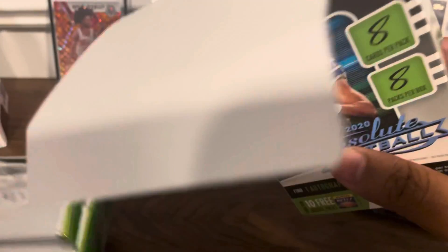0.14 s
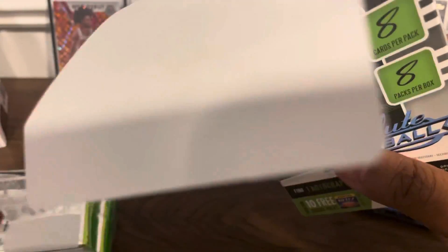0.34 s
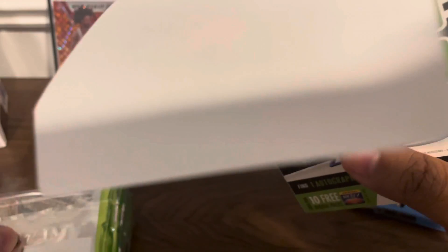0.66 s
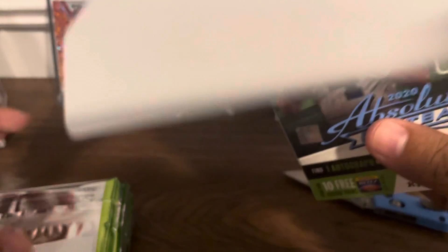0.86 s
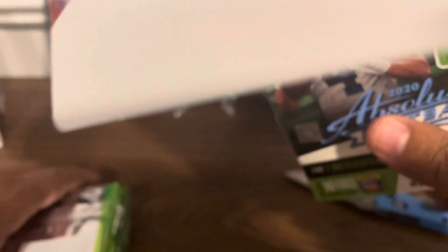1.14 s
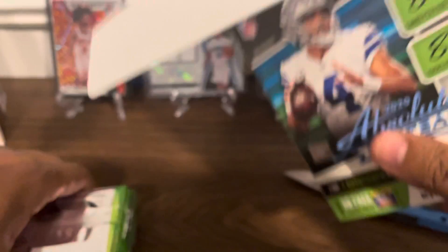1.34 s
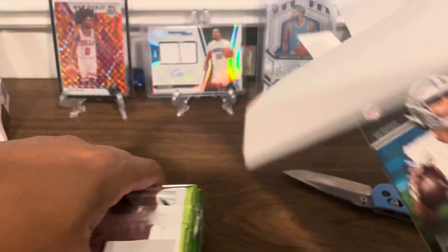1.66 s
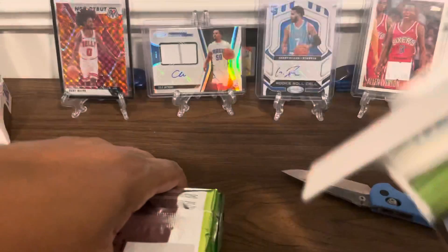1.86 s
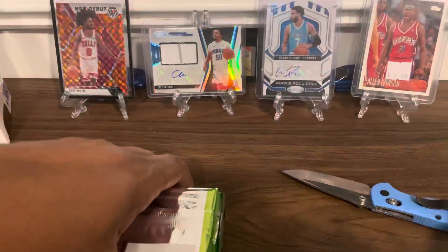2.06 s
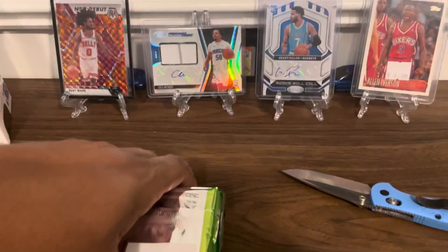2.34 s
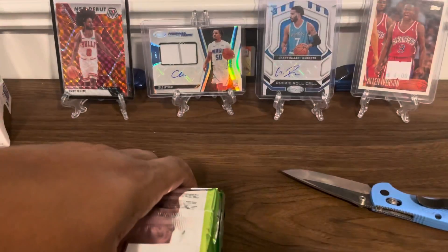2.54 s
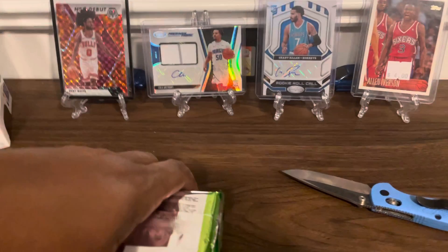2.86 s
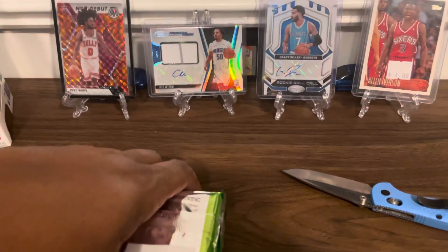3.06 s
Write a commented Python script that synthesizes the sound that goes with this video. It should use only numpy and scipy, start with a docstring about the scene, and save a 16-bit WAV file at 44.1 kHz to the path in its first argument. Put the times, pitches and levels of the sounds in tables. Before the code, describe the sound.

Cardboard box handling: foil packs snap and rustle at left, pause, crackle again, then the box clatters and rubs down at right with soft wooden thuds; close stereo phone pickup, short room echo, faint air.

```python
"""A hand grips a stack of foil packs on a wooden table: snaps of noise crackle and fine grains rustle.
An empty cardboard box is set down to the right: rough contacts ring its modes, and card scrapes as noise.
The table thuds in decaying low modes and rumbles under shifting weight; a small metal stand pings once.
A small quiet room adds a short echo and faint air; a phone with two microphone ports hears it close by."""
import sys
import numpy as np
from scipy import signal
from scipy.fft import rfft, irfft
from scipy.io import wavfile
from scipy.ndimage import uniform_filter1d

SR = 44100
rng = np.random.default_rng(int(sys.argv[2]) if len(sys.argv) > 2 else 0)


def wav_out(sig):
    """Save sig, one row per channel (or a flat mono array), as 16-bit PCM at SR to the path in sys.argv[1]."""
    wavfile.write(sys.argv[1], SR, np.round(np.clip(np.atleast_2d(sig).T, -1, 1) * 32767).astype(np.int16))


N = 141120  # length in samples
T = np.arange(N) / SR  # time in seconds
BOX_FROM_S = 1.76  # from here the rustle comes from the box
LATE = T > BOX_FROM_S
OPPOSITE = np.array([[1], [-1]])  # one sign for each port

# The low, middle and high noise bands of foil and card.
# Each row: centre in Hz, width in Hz.
NOISE_BANDS = [(1100, 1340), (4000, 3600), (11000, 5450)]
# The ways the cardboard box can ring.
# Each row: pitch in Hz, relative level in dB, time to fade by 60 dB in seconds.
BOX_MODES = [(355, -5.5, 0.064), (434, -7.5, 0.048), (593.6, -7.5, 0.053), (691, -7.5, 0.069),
             (813, -0.5, 0.07), (881, -1.5, 0.081), (1026, 5, 0.055), (1298, 4, 0.025), (1576, 7.5, 0.018),
             (1780, 12, 0.018), (1925, 10.5, 0.022), (2580, 8, 0.035)]


def amp(db):
    """Turns dB into a plain gain."""
    return 10 ** (np.asarray(db) / 20)


def band(x, hz, width):
    """Keeps a band around hz, with edges width apart."""
    low_edge = np.sqrt(hz ** 2 + width ** 2 / 4) - width / 2
    high_edge = min(low_edge + width, .45 * SR)
    return signal.sosfilt(signal.butter(2, [low_edge, high_edge], "band", fs=SR, output="sos"), x)


def unit(x):
    """Scales a signal to an average (RMS) level of 1."""
    return x / np.sqrt(np.mean(x ** 2))


def curve(rows, col):
    """Gain over time, drawn between the dB values in one column."""
    rows = np.array(rows)
    return amp(np.interp(T, rows[:, 0], rows[:, col]))


def log_curve(f, rows):
    """Values drawn between the rows along a logarithmic pitch scale."""
    hz, value = np.array(rows).T
    return np.interp(np.log(f), np.log(hz), value)


def add(out, s, x, db):
    """Mixes x in at time s with its peak at db."""
    i = int(s * SR)
    out[i:i + len(x)] += (x * amp(db) / np.abs(x).max())[:N - i]


def fade(t, t60):
    """Dies away by 60 dB in t60 seconds."""
    return np.exp(-np.log(1000) * t / t60)


def ring(modes, lags=0, size=16384):
    """One blow sounds a set of modes: fading sine waves, each starting after its lag in seconds."""
    hz, db, t60 = np.array(modes).T[:, :, None]
    t = np.clip(np.arange(size) / SR - lags, 0, None)
    return (amp(db) * np.sin(2 * np.pi * hz * t) * fade(t, t60)).sum(axis=0)


def blow(modes, pitch, db_per_oct, chance, lags=0):
    """A blow favours modes near its pitch; each finds them a little shifted, some turned over."""
    detune, scatter_db = .045, 2  # random shifts of pitch and level from blow to blow
    hz, db, t60 = np.array(modes).T
    shift, scatter, turn = chance
    db = db - db_per_oct * np.abs(np.log2(hz / pitch)) + scatter_db * scatter
    hz = hz * (1 + detune * shift) * np.sign(turn)  # a negative pitch turns the wave over
    return ring(np.array([hz, db, t60]).T, lags)


def ring_on(noise, modes):
    """Lets two rows of steady noise keep a set of modes ringing."""
    return signal.fftconvolve(noise, ring(modes)[None], axes=1)[:, :N]


def walk(rate):
    """Random level that wanders about rate times a second, with RMS 1."""
    k = int(SR / rate)
    steps = np.repeat(rng.uniform(-1, 1, N // k + 1), k)
    return unit(uniform_filter1d(steps, k)[:N])


def ports(x, phase, balance):
    """Sends a sound to both ports with a phase and level difference that depend on pitch."""
    f = np.arange(N // 2 + 1) * SR / N
    turn = np.interp(f, *np.array(phase).T)
    half = amp(log_curve(f + 1, balance) / 2) * np.exp(.5j * turn)  # each port takes half the difference
    return irfft(rfft(x) * np.array([half, 1 / half]), N)


def crackles():
    """Each foil crease snaps: a short noise crack with a weaker, longer tail, in three bands."""
    # Each row: start in seconds, peak level in dB, low band and high band in dB against the middle one.
    snaps = [(0.0296, -35, 4, -6), (0.1878, -25.5, 7, -23.5), (0.2157, -24, 4.5, -2.5),
             (0.2253, -24, 2.5, 3), (0.2486, -19, -1.5, 2), (0.2778, -26.5, -4, -0.5),
             (0.3013, -15, -10.5, 9.5), (0.364, -37.5, 12.5, 0.5), (0.4297, -15, 0, 7),
             (0.4505, -31, -3, -7.5), (0.462, -30, -3.5, -4.5), (0.473, -30, 5, -15.5),
             (0.5213, -21.5, -4, 1), (0.5421, -23.5, 6, -5.5), (0.621, -32.5, 4, 8.5),
             (0.638, -27.5, 1.5, -2), (0.6515, -13.5, 3, 1.5), (0.73, -28.5, -1, -1),
             (1.1294, -18.5, -5, 7.5), (1.148, -18, 1, 4), (1.179, -34, 7, -26), (1.3038, -26.5, 0.5, -5.5),
             (1.4182, -29.5, 7.5, -0.5), (2.0189, -38.5, 12, 7), (2.7308, -27.5, 5.5, -1.5),
             (2.8458, -19.5, -48, -8.5), (3.1535, -39, -1, 11)]
    crack_ms, tail_ms, tail_db = .9, 7, -17
    out, ms = np.zeros(N), np.arange(2048) / SR * 1000
    decay = np.exp(-ms / crack_ms) + amp(tail_db) * np.exp(-ms / tail_ms)
    envelope = np.clip(ms / 0.3, 0, 1) * decay
    noises = rng.standard_normal((len(snaps), len(ms)))
    for (s, db, body_db, sheen_db), noise in zip(snaps, noises):
        gains_db = (body_db, 0, sheen_db)
        crack = sum(amp(g) * band(noise * envelope, *b) for g, b in zip(gains_db, NOISE_BANDS))
        add(out, s, crack, db)
    return out


def rustle():
    """Dense tiny grains in three bands; late on, the lowest is card rubbing that rings the box."""
    # How loud foil and then card rustle over time.
    # Each row: time in seconds, level of the low, middle and high band in dB.
    rustle_levels = [(0, -66, -74.5, -65), (.18, -69, -63.5, -59), (.22, -57.5, -73, -87),
                     (.42, -68, -61, -54), (.44, -52.5, -59.5, -52), (.56, -56.5, -59.5, -51),
                     (.6, -65, -62.5, -62.5), (.74, -67, -59.5, -77), (.9, -88.5, -99, -104),
                     (1.105, -84.5, -117, -111), (1.13, -53.5, -50, -51), (1.17, -61.5, -67, -57),
                     (1.35, -61.5, -61.5, -51.5), (1.45, -57, -60, -50.5), (1.6, -65, -66, -50.5),
                     (1.75, -81.5, -67, -59), (1.81, -63.5, -66, -64), (1.93, -100, -97.5, -88),
                     (2.01, -89, -79, -76), (2.03, -76.5, -60, -61), (2.1, -63.5, -90, -67),
                     (2.115, -68, -56, -63), (2.26, -57, -53.5, -51.5), (2.29, -74, -70, -65),
                     (2.315, -51, -37.5, -38), (2.375, -36.5, -34.5, -38.5), (2.41, -54.5, -64, -75),
                     (2.52, -59.5, -58, -57.5), (2.69, -69, -76.5, -81), (2.72, -61.5, -46, -57),
                     (2.8, -62.5, -51, -55), (2.83, -59, -66, -88), (2.9, -58, -64, -74),
                     (3.2, -77, -66.5, -67.5)]
    grains_per_s, grain_spread_db = 6000, 2.5  # foil grains
    patchy_db, flicker_db = 1.5, 2  # unevenness between narrow bands of card; flicker of each band

    # First row: what both ports share. Second row: what they hear unlike.
    boost_db = grain_spread_db * np.minimum(rng.exponential(size=(2, N)), 4)
    size = amp(boost_db) * rng.standard_normal((2, N))
    chance = np.where(LATE, 1, grains_per_s / SR)  # card rubs evenly, with a grain at every sample
    card_size = np.sign(size) * np.sqrt(np.abs(size))  # evens out the grain sizes
    size = np.where(LATE, card_size, size * np.sqrt(.5 / chance))
    low, mid, high = (unit(band((rng.random((2, N)) < chance) * size, *b)) for b in NOISE_BANDS)

    rubbed_box = unit(ring_on(low, BOX_MODES)) + 1.86 * low
    low = np.where(LATE, rubbed_box, low)
    patches = np.zeros((2, N))
    for k in range(5):
        hz = 2300 * 1.323 ** k
        patches += band(mid, hz, hz / 3) * amp(patchy_db * walk(70) - 1.4 * k)
    mid = np.where(LATE, unit(patches), mid)
    high = high * np.array([[1], [.2]])  # the treble is more alike at the ports

    out = np.zeros((2, N))
    for k, x in enumerate((low, mid, high)):
        out += x * curve(rustle_levels, k + 1) * amp(flicker_db * walk(29.55))
    return out


def box():
    """Knocks ring the box through a soft, rough contact, with a brief slap of card."""
    # Each row: start in seconds, peak level of the ringing in dB, favoured pitch in Hz.
    knocks = [(1.804, -32.5, 778), (1.895, -43.5, 815), (2.064, -37.5, 567), (2.108, -36, 383),
              (2.199, -19.5, 654), (2.241, -25, 548), (2.277, -26.5, 735), (2.332, -17, 886),
              (2.352, -21.5, 1930), (2.366, -18.5, 800), (2.386, -12, 860), (2.47, -23, 585),
              (2.846, -23.5, 566), (2.855, -25, 830), (3.005, -44, 875)]
    favour_db_per_oct, contact_ms = 8, 1.94
    slap_db, slap_ms = -18, 6.2  # slap level is against the ringing
    out, ms = np.zeros(N), np.arange(2048) / SR * 1000
    paired_modes = 2 * BOX_MODES  # each mode sounds twice, slightly apart in pitch, for a rougher knock
    chances = rng.standard_normal((len(knocks), 3, len(paired_modes)))
    noises = rng.standard_normal((len(knocks), len(ms)))
    for (s, db, pitch), noise, chance in zip(knocks, noises, chances):
        rough_tone = np.sin(2 * np.pi * pitch * ms / 1000) + 1.58 * noise
        contact = rough_tone * ms * np.exp(-2 * ms / contact_ms)
        ringing = blow(paired_modes, pitch, favour_db_per_oct, chance)
        add(out, s, signal.fftconvolve(ringing, contact), db)
        slap = noise * np.clip(ms, 0, 1) * np.exp(-ms / slap_ms)
        add(out, s, band(slap, *NOISE_BANDS[1]), db + slap_db)
    return out


def metal_stand():
    """A small metal stand rings once: a few high modes fade together."""
    # Each row: pitch in Hz, relative level in dB, time to fade by 60 dB in seconds.
    stand_modes = [(3155, 0, .45), (4414, -6, .3), (5798, -9, .4), (7262, -13, .4)]
    out = np.zeros(N)
    add(out, 3.027, ring(stand_modes), -56)  # start in seconds, peak in dB
    return out


def table():
    """Thuds sweep downward as the low modes arrive late; shifting weight keeps them rumbling."""
    # Each row: start in seconds, peak level in dB, favoured pitch in Hz.
    thuds = [(0.213, -37, 312), (0.22, -44, 65), (0.544, -38.5, 84.5), (.647, -40, 300), (0.661, -48, 62),
             (1.183, -27.5, 240), (1.19, -26.5, 64), (1.42, -26, 224), (1.606, -40, 180),
             (2.205, -28.5, 170), (2.232, -27.5, 130), (2.253, -28, 290), (2.345, -27.5, 160),
             (2.368, -30.5, 174), (2.408, -31, 200), (2.467, -33.5, 254), (2.622, -39, 270),
             (2.8, -33.5, 95), (2.823, -31, 197), (2.886, -34, 100), (2.98, -37, 165), (3.019, -41.5, 70)]
    # The ways the table top can ring.
    # Each row: pitch in Hz, relative level in dB, time to fade by 60 dB in seconds.
    table_modes = [(63.7, -6, 0.26), (114.2, -2, 0.092), (149.7, 1, 0.068), (186.8, -4.5, 0.12),
                   (248.3, -1, 0.061), (325.3, -3.5, 0.091), (454, 7.5, 0.029), (640, -8, 0.085)]
    # Weight shifting on the table.
    # Each row: time in seconds, level of the lowest mode in dB, level of the next five modes in dB.
    rumble_levels = [(0, -72, -68), (.7, -72.5, -65), (.9, -85.5, -79), (1.15, -75, -70), (1.3, -52, -54),
                     (1.42, -64, -48), (1.52, -44, -48.5), (1.77, -74, -61.5), (2.1, -55.5, -61.5),
                     (2.35, -54, -36.5), (2.6, -62, -62), (2.88, -47, -49.5), (3.2, -68, -69)]
    favour_db_per_oct, bend_lag_ms = 10, 16.2

    out, hz = np.zeros((2, N)), np.array(table_modes)[:, :1]
    lags = bend_lag_ms / 1000 * (np.sqrt(60 / hz) - .31)  # low bending waves come late
    chances = rng.standard_normal((len(thuds), 3, len(table_modes)))
    for (s, db, pitch), chance in zip(thuds, chances):
        add(out[0], s, blow(table_modes, pitch, favour_db_per_oct, chance, lags), db)
    for k, modes in enumerate((table_modes[:1], table_modes[1:6])):
        push = rng.standard_normal((2, N)) * amp(1.85 * walk(29.94))
        out = out + unit(ring_on(push, modes)) * curve(rumble_levels, k + 1)
    return out


def room_echo(dry):
    """The room answers with a short spray of reflections: noise that fades, unlike at each port."""
    echo_db, echo_t60_s = -9.5, 0.34
    t = T[:SR // 2]
    tail = rng.standard_normal((2, len(t))) * fade(t, echo_t60_s) * np.clip(t / 0.0048, 0, 1)
    tail = band(tail, 1000, 12000)
    tail = tail / np.sqrt((tail ** 2).sum() / 2)
    return amp(echo_db) * signal.fftconvolve(dry.mean(axis=0)[None], tail, axes=1)[:, :N]


def room_tone():
    """Faint steady air is shaped noise; its bass is more alike left and right."""
    # Each row: pitch in Hz, relative level in dB.
    air_shape = [(18, -50), (30, -7.5), (64, -3), (210, -28.5), (280, -5.5), (526, -26.5), (1390, -43.5),
                 (16000, -29)]
    f = np.arange(N // 2 + 1) * SR / N + 1
    mid, side = rfft(rng.standard_normal((2, N))) * amp(log_curve(f, air_shape))
    air = irfft(mid + np.clip(f / 1200, 0, 1) * side * OPPOSITE, N)
    return unit(air) * amp(-71.5)


def scene():
    """Places packs, box and table between the two ports, then adds the room."""
    # How far the left port leads. Each row: pitch in Hz, phase in radians.
    packs_phase = [(0, 0), (1100, 2.1), (1600, .5)]
    box_phase = [(0, 0), (340, .7), (690, -2), (1980, -1.7), (3190, 1.5)]
    treble_phase = [(5200, .8), (5900, -1.5), (6800, -.9), (7600, -3), (10000, -3.5), (12200, -6.2),
                    (16000, -6.3)]  # for both packs and box
    # How much louder the left port is. Each row: pitch in Hz, left minus right in dB.
    packs_balance = [(300, 2), (2400, 3), (8000, 0)]
    box_balance = [(200, -1), (800, -7), (2400, 0), (4400, 1.5), (8000, 0)]
    rustle_spread, rumble_spread = 0.43, 0.2  # gain of the part that the ports hear unlike

    hiss, hiss_unlike = rustle()
    packs = crackles() + hiss * ~LATE
    box_side = box() + metal_stand() + hiss * LATE
    below, below_unlike = table()
    dry = ports(packs, packs_phase + treble_phase, packs_balance)
    dry = dry + ports(box_side, box_phase + treble_phase, box_balance)
    dry = dry + ports(below, [(0, 0.27), (500, 0.65)], [(60, 1.6), (300, -0.3)])
    dry = dry + (rustle_spread * hiss_unlike + rumble_spread * below_unlike) * OPPOSITE
    return dry + room_echo(dry) + room_tone()


def record(dry):
    """The phone thins the deepest bass, rolls off the treble and cuts the top."""
    bass_cut_hz, roll_off_hz, top_hz = 45.5, 11570, 16300
    dry = signal.sosfilt(signal.butter(3, bass_cut_hz, "high", fs=SR, output="sos"), dry)
    dry = signal.sosfilt(signal.butter(3, roll_off_hz, fs=SR, output="sos"), dry)
    return signal.sosfilt(signal.ellip(10, .2, 80, top_hz, fs=SR, output="sos"), dry)


dry = scene()
out = record(dry)
wav_out(out)
```